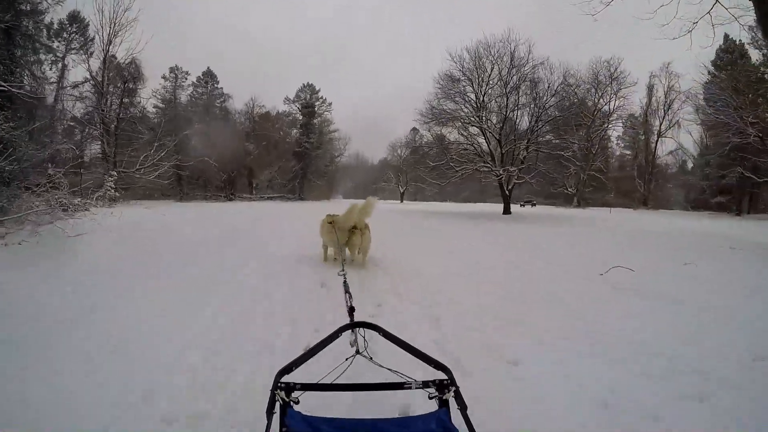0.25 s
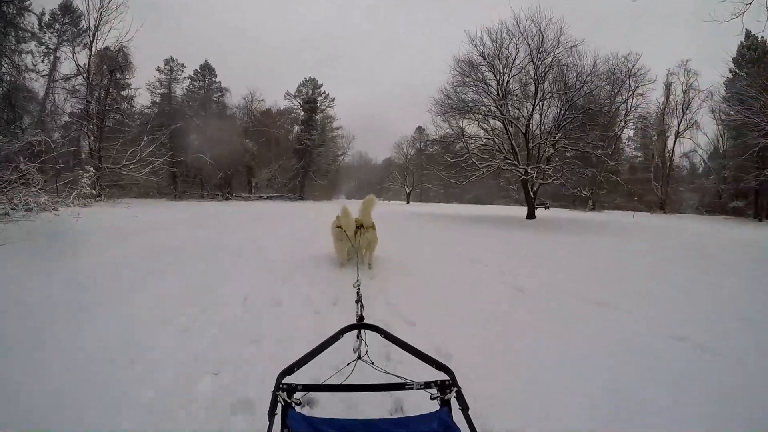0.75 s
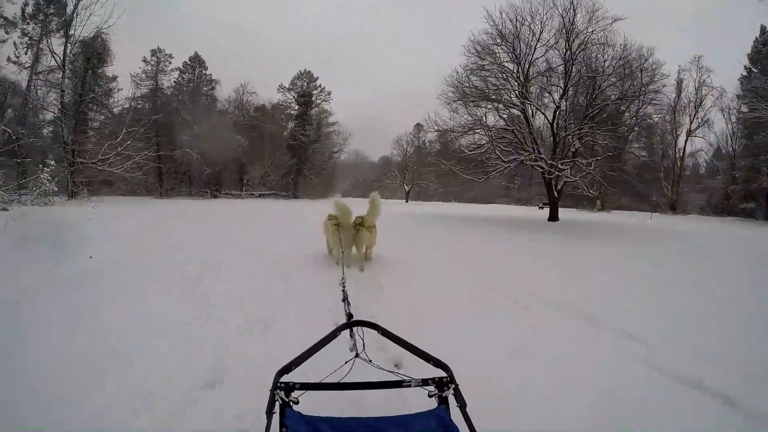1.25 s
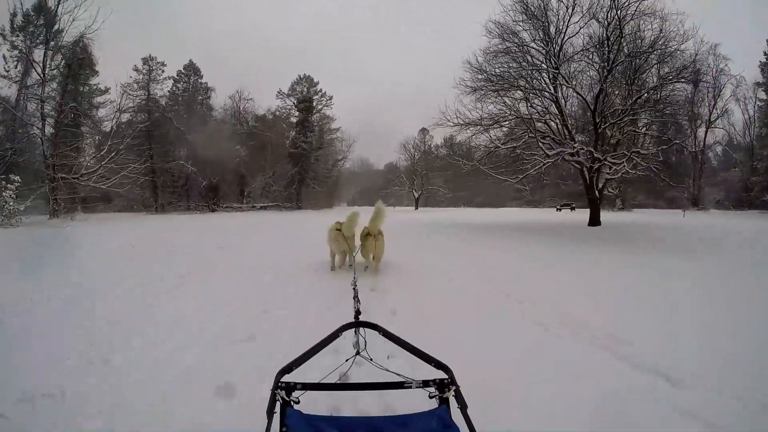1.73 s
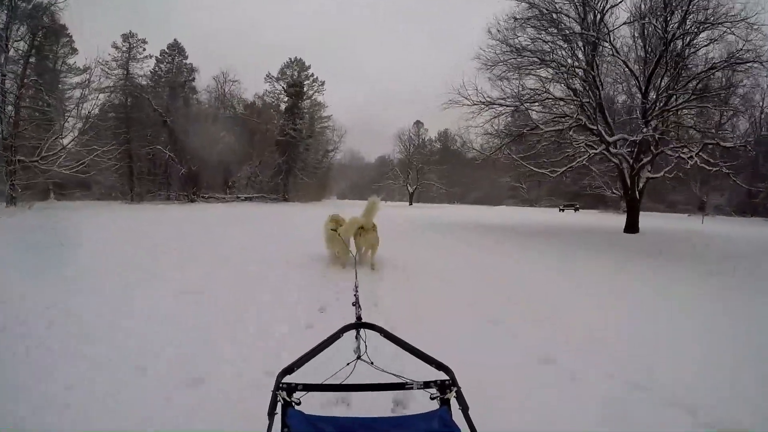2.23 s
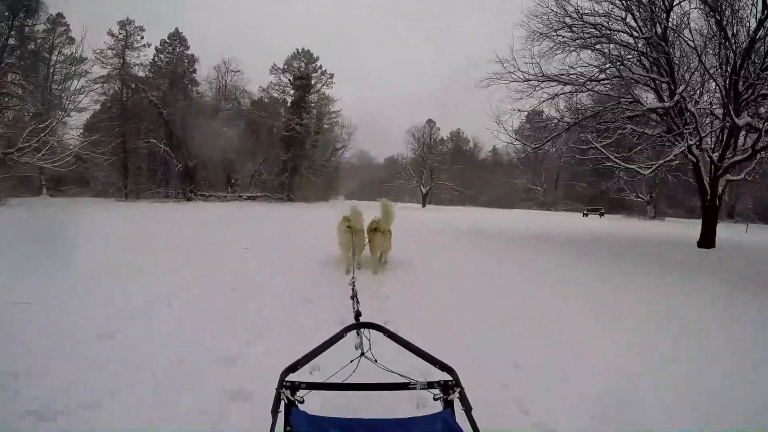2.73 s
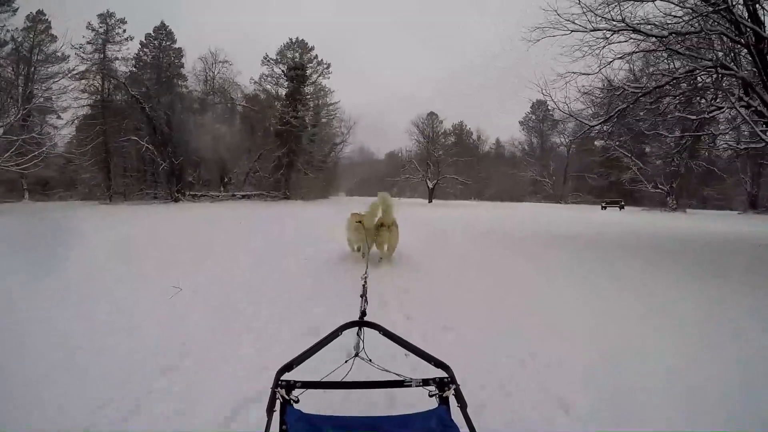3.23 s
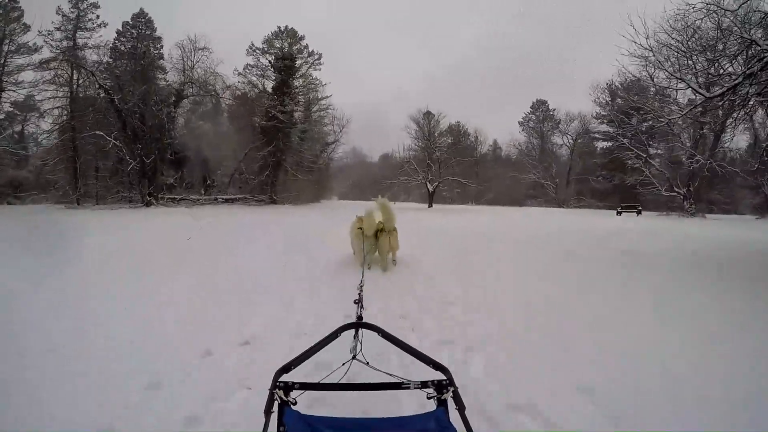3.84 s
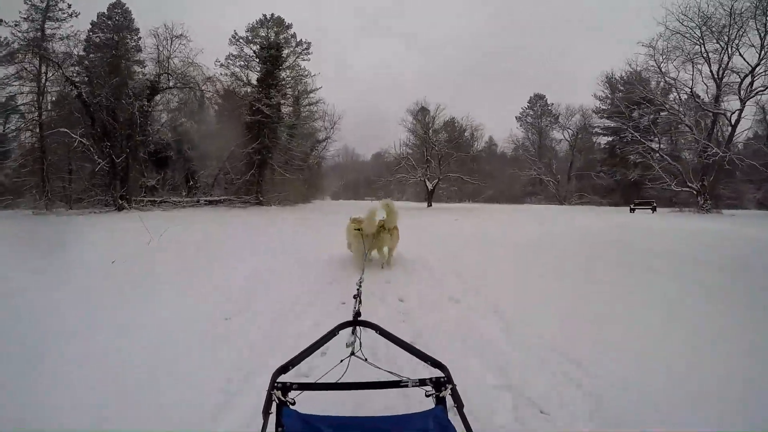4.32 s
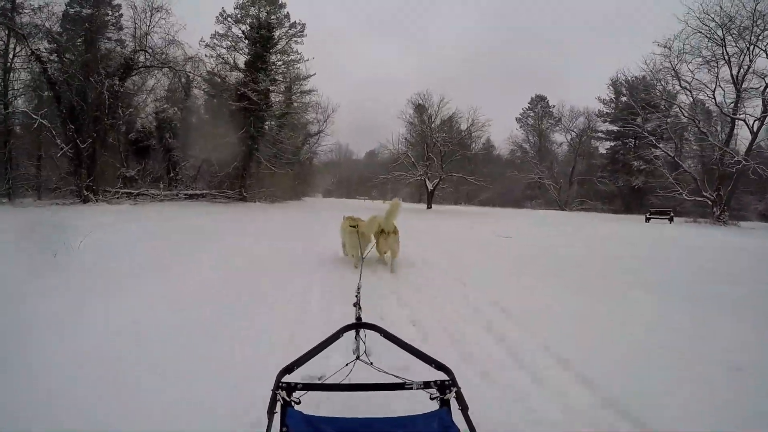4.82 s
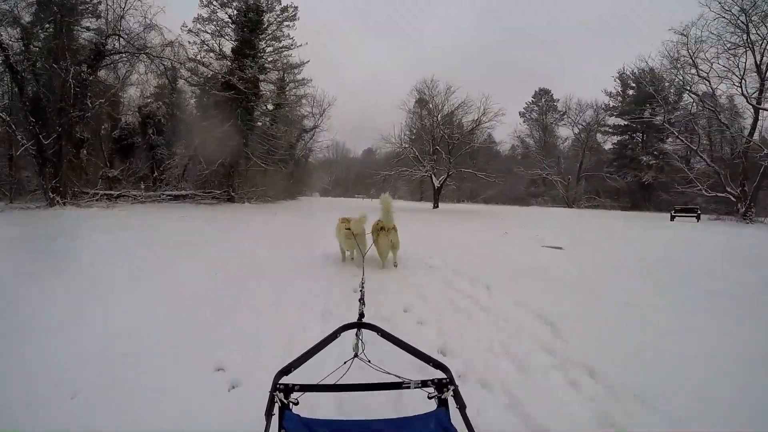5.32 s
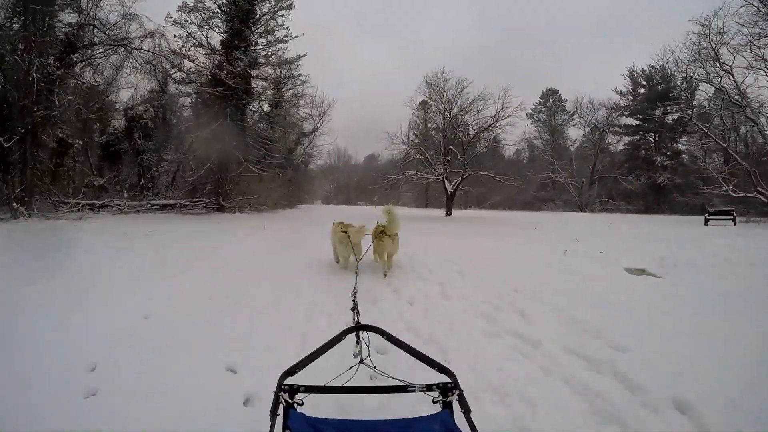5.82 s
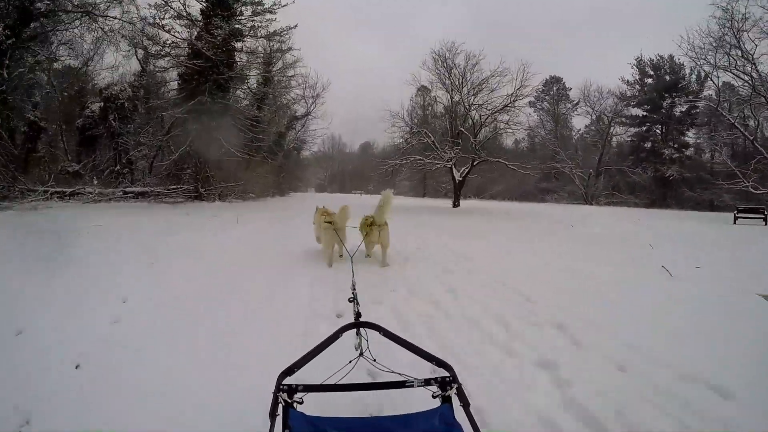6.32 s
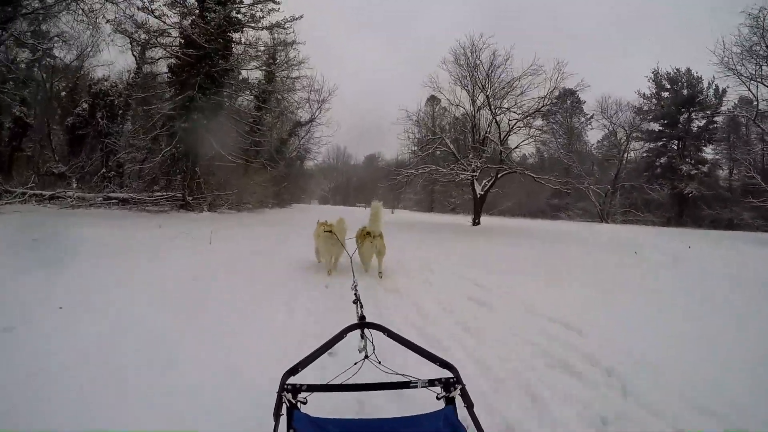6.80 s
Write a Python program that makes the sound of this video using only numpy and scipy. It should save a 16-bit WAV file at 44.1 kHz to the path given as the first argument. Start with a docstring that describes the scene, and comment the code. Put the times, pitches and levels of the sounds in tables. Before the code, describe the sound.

For about seven seconds a dog sled glides over packed snow, heard close, dry and mono by a microphone fixed to its frame. A deep soft rumble and thin, slightly fluttering powder hiss run throughout. From the start, runners bite in short uneven rubs, roughly six a second, each with gritty crackle and a brief low hum. Dull hollow knocks cluster around 0.8-1.3 s, with squeaking crust. More bumps come at 1.7 and 2.2 s, then crisp little line ticks near 2.6 s. Knocks gather again from 2.9 to 3.3 s; a stronger, longer rub arrives at 3.75 s. Crust cracks busily around 4.0-4.3 s, followed by the heaviest thumps from 4.3 to 4.5 s. Knocks and squeaks continue around 5-5.5 s, then thin out, with final bumps at 6.6 and 6.85 s as sliding continues.

```python
"""Uneven rubbing and crunching, dull knocks and small ticks come over a low rumble and a steady fine hiss.
It is a dog sled gliding over packed snow, heard through its own frame by a camera fixed to it.
The runners bite again and again: random tiny slips and squeaks shake resonances of frame and runners.
Lumps set off short swings, breaking crust squeaks, and hard little parts tick on the tug line.
Under it the frame hums at its lowest resonances, and smoothed-out low noise makes the sway rumble."""
import sys
import numpy as np
from scipy import signal
from scipy.io import wavfile
from scipy.ndimage import uniform_filter1d

SR = 44100
rng = np.random.default_rng(int(sys.argv[2]) if len(sys.argv) > 2 else 0)


def log_audio(samples):
    """Write samples as a 16-bit WAV file to the path given in sys.argv[1]."""
    # one column per channel
    frames = np.atleast_2d(samples).T
    # limit to full scale, then quantise
    limited = np.clip(frames, -1, 1)
    pcm = np.round(limited * 32767).astype(np.int16)
    wavfile.write(sys.argv[1], SR, pcm)


N = 311346  # length in samples
TIME = np.arange(N) / SR  # seconds
HZ = np.fft.rfftfreq(8192, 1 / SR) + 1  # filter frequencies, moved up 1 Hz to avoid zero

# low resonances of frame and camera mount, levels relative: (f/Hz, width/Hz, level/dB)
FRAME_MODES = [(440, 103, -6), (471.3, 94, -2.5), (551.7, 59, 2), (658.7, 45, -3), (648, 38, -9.5),
               (710, 7.3, -44.5), (875, 30, -32)]
# upper ring of small hard parts, levels relative: (f/Hz, width/Hz, level/dB)
HIGH_RING_MODES = [(9060, 2400, 3.5), (12600, 8900, -17)]


def amp(db):
    """Turns decibels into gain."""
    return 10 ** (np.asarray(db) / 20)


def evened(x):
    """Scales a sound to an rms (average strength) of 1."""
    return x / np.sqrt(np.mean(x ** 2) + 1e-20)


def struck(x, size=60):
    """Scales a short sound so that its loudest moment, size samples long, has an rms of 1."""
    return x / np.sqrt(uniform_filter1d(x ** 2, size).max() + 1e-20)


def curve(rows):
    """Joins (t/s, value) points by straight lines."""
    seconds, values = np.transpose(rows)
    return np.interp(TIME, seconds, values)


def add(mix, s, sound):
    """Mixes a sound in at time s, in seconds."""
    part = mix[max(round(s * SR), 0):][:len(sound)]
    part += sound[:len(part)]


def spectrum(points):
    """Gain over frequency from (f/Hz, level/dB) points, joined on a logarithmic pitch scale."""
    hz, db = np.transpose(points)
    return amp(np.interp(np.log(HZ), np.log(hz), db))


def resonances(modes, skirt):
    """Gain over frequency of a body's resonances; a higher skirt gives steeper sides."""
    power = 0
    for hz, width, db in modes:
        detuning = (HZ ** 2 - hz ** 2) / (HZ * width)
        power = power + amp(db) ** 2 / (1 + detuning ** 2) ** skirt
    return np.sqrt(power)


def ring(gain, size=3000):
    """How a body with this gain curve answers one click: it starts at once and dies away (minimum phase)."""
    half = np.log(np.maximum(gain / gain.max(), 1e-5))
    whole = np.concatenate([half, half[-2:0:-1]])
    # the Hilbert transform supplies the phase that puts the energy as early as possible
    return np.fft.ifft(np.exp(np.conj(signal.hilbert(whole)))).real[:size]


def through(drive, gain):
    """Plays a driving signal through a body and scales the result to an rms of 1."""
    return evened(signal.oaconvolve(drive, ring(gain))[:N])


def grains(per_s, spread_db, size=1200):
    """Random tiny impacts of either sign, their power steadied by a moving average used twice (size samples)."""
    sizes = amp(spread_db * np.minimum(rng.exponential(1, N), 4))
    hits = rng.random(N) < per_s / SR
    x = sizes * rng.choice([-1, 1], N) * hits
    power = uniform_filter1d(uniform_filter1d(x ** 2, size), size)
    return x / np.sqrt(np.abs(power) + 1e-6)


def swaying():
    """The swaying sled rumbles: dense random impacts are shaped into low noise that swells and fades."""
    # loudness of the sway: (t/s, level/dB)
    sway_levels = [(0, -34), (0.65, -39), (0.8, -32), (1.97, -39), (2.21, -33.5), (2.7, -34), (3.64, -39),
                   (3.83, -37.5), (4.1, -36), (4.39, -36.5), (4.7, -38), (5.3, -33), (6.1, -36),
                   (7.06, -39)]
    # tone of the rumble, levels relative: (f/Hz, level/dB)
    rumble_tone = [(10, -14.5), (28, -1.5), (45, -12.5), (70, -17.5), (400, -73.5)]
    return amp(curve(sway_levels)) * through(grains(per_s=1500, spread_db=-0.5), spectrum(rumble_tone))


def bites():
    """Gains of rubbing, crunching and hum: the runners glide lightly, and each bite sets in, sags and lets go."""
    # bites into the snow, layer levels at mid-bite before each layer's level_db:
    # (start t/s, length t/s, rubbing level/dB, crunching level/dB, hum level/dB)
    bite_rows = [(0, 0.066, -33.5, -46.5, -36.5), (0.156, 0.068, -35, -46.5, -41.5),
                 (0.357, 0.059, -32, -42.5, -38), (0.494, 0.066, -39, -50.5, -53),
                 (0.69, 0.17, -36.5, -49.5, -39), (0.864, 0.19, -36, -47.5, -37.5),
                 (1.114, 0.066, -37, -59, -36.5), (1.198, 0.075, -34.0, -45.5, -36),
                 (1.281, 0.079, -32, -45, -31.5), (1.38, 0.07, -39, -49, -42),
                 (1.465, 0.132, -38, -49, -45.5), (1.689, 0.12, -36.5, -46, -34.5),
                 (2.015, 0.047, -35.5, -49.0, -37.5), (2.124, 0.08, -32, -62, -42),
                 (2.232, 0.042, -33, -48.5, -39.5), (2.417, 0.047, -40.5, -46.5, -56),
                 (2.503, 0.16, -35, -46, -34), (2.702, 0.049, -40.5, -51.5, -50),
                 (2.848, 0.2, -35.5, -47, -37.5), (3.059, 0.06, -37.5, -55, -48),
                 (3.167, 0.08, -34.5, -44, -39.5), (3.388, 0.076, -41.5, -54.5, -48),
                 (3.553, 0.074, -36.5, -48.5, -37), (3.748, 0.18, -29.5, -44, -32),
                 (3.991, 0.12, -37.5, -46.5, -38.5), (4.134, 0.13, -33, -46.5, -34),
                 (4.31, 0.14, -33.5, -46.5, -33), (4.487, 0.074, -33, -43, -34),
                 (4.647, 0.064, -37, -46, -35.5), (4.761, 0.063, -33, -51.5, -39),
                 (4.892, 0.051, -33.5, -55, -31.5), (4.973, 0.062, -34, -42.5, -37),
                 (5.06, 0.082, -37.5, -53.5, -41), (5.266, 0.14, -36.0, -49.5, -37.5),
                 (5.421, 0.083, -34, -44, -34.5), (5.592, 0.074, -35, -43.5, -42.5),
                 (5.711, 0.067, -36.0, -45.0, -36), (5.86, 0.038, -36.5, -49, -37),
                 (5.955, 0.049, -35.0, -50, -37.5), (6.198, 0.13, -36.5, -50.5, -35.5),
                 (6.37, 0.056, -36.5, -51, -44), (6.5, 0.061, -45, -49, -40),
                 (6.577, 0.074, -34, -46.5, -33), (6.717, 0.17, -39, -46.5, -40.5),
                 (6.963, 0.045, -47, -47.5, -46)]
    # light gliding under the bites, before level_db: (rubbing level/dB, crunching level/dB, hum level/dB)
    coast_levels = [-43, -61.5, -45]
    rise_s, release_s, sag_db_per_s = 0.0094, 0.0092, -18
    power = np.outer(amp(coast_levels) ** 2, np.ones(N))
    t = np.arange(SR // 2) / SR
    for s, length, *levels_db in bite_rows:
        attack = np.minimum(t / rise_s, 1)
        sag = amp(sag_db_per_s * (t - length / 2))
        release = np.exp(-np.maximum(t - length, 0) / release_s)
        shape = attack * sag * release
        for layer, db in zip(power, levels_db):
            add(layer, s, (amp(db) * shape) ** 2)
    return np.sqrt(power)


def rubbing(rub, level_db=0.3):
    """Snow sticks and slips under the runners; the random slips shake the resonances of the frame."""
    slips = grains(per_s=450, spread_db=2.5, size=1500)
    return amp(level_db) * rub * through(slips, resonances(FRAME_MODES, skirt=1.414))


def humming(hum, level_db=-1):
    """The frame's lowest resonances, fed by random impacts, swell with each bite."""
    # the frame's lowest resonances, levels relative: (f/Hz, width/Hz, level/dB)
    hum_modes = [(89.5, 11.6, -5), (138.6, 38.7, -2), (143, 28, -17)]
    impacts = grains(per_s=900, spread_db=0.0)
    return amp(level_db) * hum * through(impacts, resonances(hum_modes, skirt=1.516))


def squeak(hz, rise_s=0.00107, glide=0.1665, octave_db=-4, rough_db=-1, size=600):
    """Snow crystals give way in a quickening run: a rough chirp of a few milliseconds, rising around hz."""
    u = np.arange(size) / SR / rise_s
    # the pitch climbs from 0.777 to about 1.165 times hz
    pitch = hz * 0.777 * (1 + glide * np.minimum(u, 3))
    turns = np.cumsum(pitch) / SR + rng.random()
    tone = np.sin(2 * np.pi * turns) + amp(octave_db) * np.sin(4 * np.pi * turns)
    roughness = amp(rough_db) * rng.standard_normal(size)
    return u * np.exp(-u) * (tone + roughness)


def crackle(grit, runners, level_db=0.72, smooth_db=-14, snaps_db=-6, count=16):
    """Small squeaks, more low than high, each starting with a snap, crowd over a smoother scrape."""
    sizes = grains(per_s=150, spread_db=4, size=1300)
    kind = rng.integers(count, size=N)
    squeaks = np.zeros(N)
    for k, hz in enumerate(np.geomspace(1400, 3100, count)):
        squeaks += signal.oaconvolve(sizes * (kind == k), squeak(hz))[:N]
    snaps = amp(snaps_db) * evened(sizes)
    scrape = amp(smooth_db) * rng.standard_normal(N)
    return amp(level_db) * grit * through(evened(squeaks) + snaps + scrape, runners)


def hiss(specks_db=-15, flutter_db=0.9):
    """Fine powder hisses unevenly along the runners as filtered noise, with specks of ice flicking up."""
    # loudness of the loose powder: (t/s, level/dB)
    powder_levels = [(0, -51), (1.2, -54), (2.8, -52), (3.7, -54.5), (4.55, -56), (5.1, -51), (6.55, -54),
                     (6.85, -51)]
    # tone of the sliding hiss, levels relative: (f/Hz, level/dB)
    hiss_tone = [(300, 15), (1100, 4.5), (2600, -0.5), (5000, -0.5), (7000, -7.5), (9300, -13.5),
                 (11500, -10.5), (15500, -15)]
    flutter = evened(uniform_filter1d(uniform_filter1d(rng.standard_normal(N), 2500), 1200))
    powder = amp(flutter_db * flutter) * through(rng.standard_normal(N), spectrum(hiss_tone))
    flicks = grains(per_s=260, spread_db=7, size=8000)
    specks = amp(specks_db) * through(flicks, resonances(HIGH_RING_MODES, skirt=0.38))
    return amp(curve(powder_levels)) * (powder + specks)


def crunches(runners):
    """Larger pieces of crust break under a runner: each squeaks loudly and rings the runners."""
    # the largest breaking pieces: (t/s, level/dB, middle of the squeak f/Hz)
    crust_pieces = [(0.102, -27, 1750), (0.185, -33, 2860), (0.383, -35, 2800), (0.883, -29.5, 3060),
                    (0.899, -30, 2360), (0.931, -31.5, 1860), (1.033, -33, 1740), (1.212, -30.5, 2900),
                    (1.305, -31.5, 2370), (1.327, -32, 1790), (1.481, -38, 2100), (1.556, -29.5, 3120),
                    (2.255, -31, 2840), (2.361, -33.5, 1730), (2.989, -33.5, 2980), (3.182, -29.5, 2900),
                    (3.22, -33, 2750), (3.244, -33.5, 2570), (3.395, -38.5, 2560), (3.646, -36.5, 1620),
                    (3.871, -33, 2140), (3.888, -32, 2670), (4.02, -32.5, 2640), (4.071, -29.5, 1980),
                    (4.159, -30, 2900), (4.167, -27, 1890), (4.223, -30, 1600), (4.327, -31, 2640),
                    (4.667, -33, 2800), (4.683, -32.5, 2900), (4.915, -33, 1670), (4.987, -34, 2570),
                    (5.005, -34, 2630), (5.128, -30, 2900), (5.276, -32, 2900), (5.357, -30.5, 1750),
                    (5.368, -30.5, 1650), (5.446, -31, 2800), (5.454, -30, 2500), (5.984, -35, 1840),
                    (6.219, -32, 2900), (6.25, -40.5, 1290), (6.801, -32.5, 2210), (6.85, -28.5, 1790)]
    out, body = np.zeros(N), ring(runners)
    for s, db, hz in crust_pieces:
        add(out, s, amp(db) * struck(signal.fftconvolve(squeak(hz), body)))
    return out


def fracture(decay_s, size=600):
    """A quick run of micro-cracks: noise that swells and dies away."""
    u = np.arange(size) / SR / decay_s
    return rng.standard_normal(size) * np.sqrt(u) * np.exp(-u)


def swing(hz, rise_s, size=3000):
    """A few cycles near hz, drawn a little off each time, that build up and die away."""
    t = np.arange(size) / SR
    swell = (t / rise_s) ** 1.65 * np.exp(-t / rise_s)
    pitch = hz * rng.uniform(0.888, 1.059)
    return struck(swell * np.sin(2 * np.pi * pitch * t))


def knocks(runners, frame_db=-9, hard_db=-1, thud_db=-15, snap_db=-21):
    """Each lump cracks and gives the mount a few heavy swings; the frame rings on and hums."""
    # lumps that knock the frame, level of swings and rattle together:
    # (t/s, level/dB, upper swing against main swing level/dB before hard_db)
    lumps = [(0.163, -25, -20), (0.796, -19.5, -34), (0.872, -24.5, -26), (0.897, -18.5, -22),
             (0.92, -21.5, -28), (0.972, -17, -33), (1.213, -25.5, -14), (1.304, -17.5, -23),
             (1.326, -24.5, -30), (1.714, -20.5, -35), (1.774, -23.5, -16), (2.165, -17.5, -23),
             (2.183, -22, -24), (2.252, -22.5, -21), (2.911, -19.5, -18), (3.007, -21.5, -35),
             (3.102, -22, -24), (3.196, -21.5, -19), (3.3, -21.5, -30), (3.795, -22, -23),
             (3.836, -26, -15), (3.907, -23, -35), (4.313, -16, -12.5), (4.406, -17.5, -20),
             (4.522, -18, -12.5), (4.767, -20, -34), (4.798, -25, -30), (4.973, -20.5, -26), (5, -20, -24),
             (5.437, -19, -11), (5.742, -23.5, -34), (6.606, -18, -27), (6.843, -22, -12)]
    out = np.zeros(N)
    frame, body = ring(resonances(FRAME_MODES, skirt=1.29)), ring(runners)
    for s, db, upper_db in lumps:
        main_swing = swing(hz=532.5, rise_s=0.0016)
        upper_swing = amp(upper_db + hard_db) * swing(hz=902, rise_s=0.0025)
        blow = main_swing + upper_swing
        rattle = struck(signal.fftconvolve(fracture(decay_s=0.014), frame)[:len(blow)])
        thud = amp(thud_db) * swing(hz=131.2, rise_s=0.008)
        snap = amp(snap_db) * struck(signal.fftconvolve(fracture(decay_s=0.0021), body)[:len(blow)])
        add(out, s, amp(db) * (struck(blow + amp(frame_db) * rattle) + thud + snap))
    return out


def ticks(level_db=0, low_ring_db=-1, scuff_db=-7):
    """Small hard parts on the line touch and scuff: a click and a noise burst set off two very short rings."""
    # ticks of the line's hardware: (t/s, high ring level/dB, low ring against high ring level/dB before low_ring_db)
    line_ticks = [(0.883, -39.5, 7), (1.219, -40.5, 7.5), (1.306, -30.5, 3.5), (1.507, -37.5, 8.5),
                  (1.589, -39, 6), (1.783, -36, 6), (2.17, -40.5, 7.5), (2.2, -34.5, 6.5), (2.611, -33, 7),
                  (2.638, -30.5, 0.5), (2.692, -37.5, 5), (2.965, -45, 0), (2.987, -40, 11.5),
                  (3.004, -42, 9), (3.181, -45, -6), (3.792, -36.5, 1), (3.859, -35, 7.5), (3.868, -46, 7),
                  (4.191, -39.5, 8), (4.508, -36, 3), (4.827, -41, -6), (4.982, -32, 2.5),
                  (5.446, -41.5, 1), (5.847, -46, 7), (6.2, -43, 2), (6.56, -50, -7), (6.935, -43, 5)]
    # lower ring of a tick: (f/Hz, width/Hz, level/dB)
    low_ring_modes = [(4130, 550, 0)]
    out = np.zeros(N)
    low = ring(resonances(low_ring_modes, skirt=1.32))
    high = ring(resonances(HIGH_RING_MODES, skirt=2.3))
    for s, db, low_db in line_ticks:
        touch = amp(scuff_db) * fracture(decay_s=0.00036)
        touch[0] = 1  # the click of first contact
        low_ring = struck(signal.fftconvolve(touch, low))
        high_ring = struck(signal.fftconvolve(touch, high))
        add(out, s, amp(db + level_db) * (high_ring + amp(low_db + low_ring_db) * low_ring))
    return out


def scene():
    """Adds up all that reaches the camera through the sled."""
    # resonances of the runners, levels relative: (f/Hz, width/Hz, level/dB)
    runner_modes = [(1480, 205, 4), (1750, 21, -12.5), (2272, 140, 3), (2451, 58, 5), (2734, 73, 5.5),
                    (2900, 164, -2), (3262, 97, 0), (4110, 410, -8), (4580, 240, -2), (5140, 230, -5.5),
                    (6100, 130, -20)]
    runners = resonances(runner_modes, skirt=1.174)
    rub, grit, hum = bites()
    sliding = rubbing(rub) + humming(hum) + crackle(grit, runners) + hiss()
    mix = swaying() + sliding + crunches(runners) + knocks(runners) + ticks()
    return mix[None]  # one channel


def record(dry):
    """The camera's band limit: a low-pass filter takes away the highest treble."""
    edge_hz = 15600
    low_pass = signal.firwin(301, edge_hz, window=("kaiser", 8), fs=SR)
    return signal.oaconvolve(dry, low_pass[None], "same")


dry = scene()
out = record(dry)
log_audio(out)
```